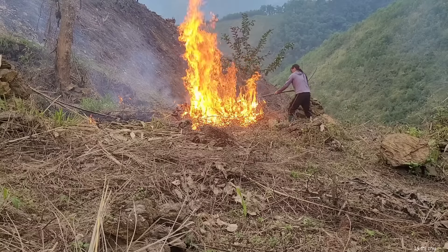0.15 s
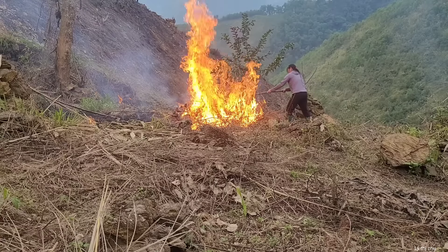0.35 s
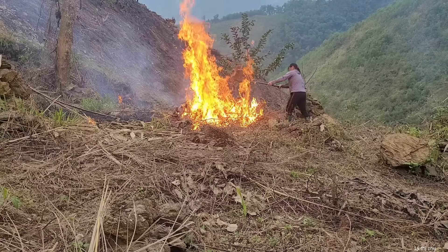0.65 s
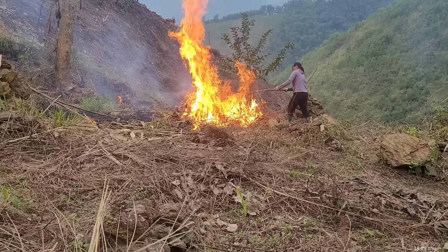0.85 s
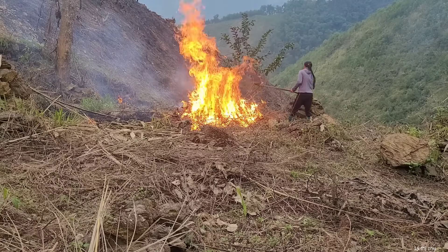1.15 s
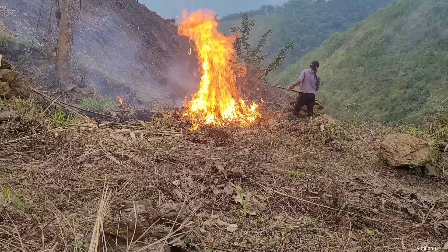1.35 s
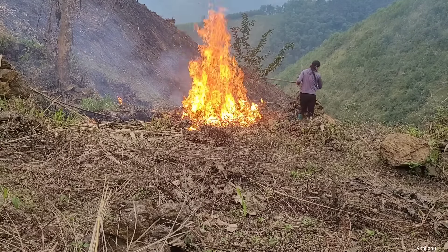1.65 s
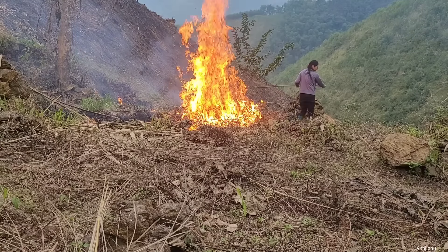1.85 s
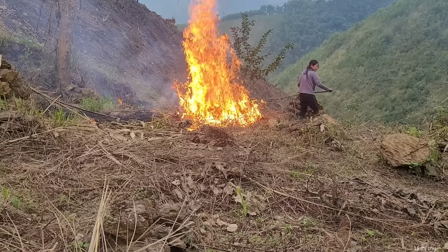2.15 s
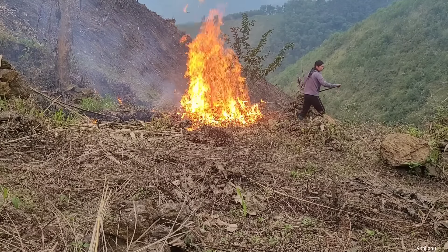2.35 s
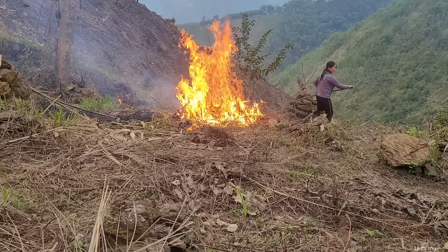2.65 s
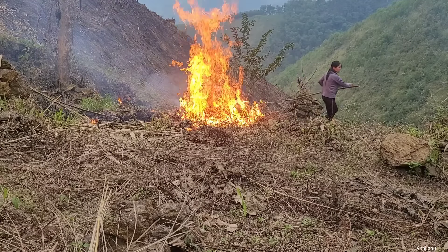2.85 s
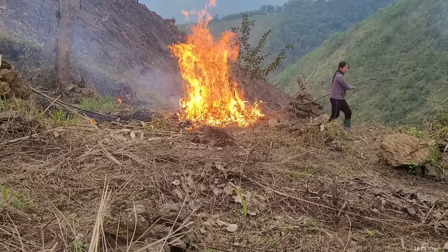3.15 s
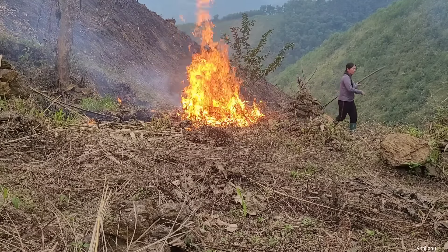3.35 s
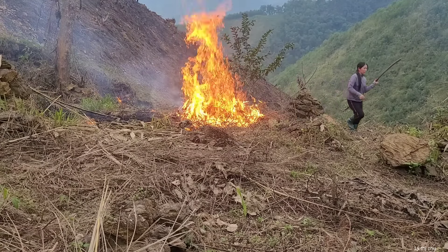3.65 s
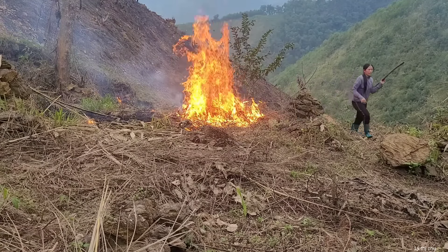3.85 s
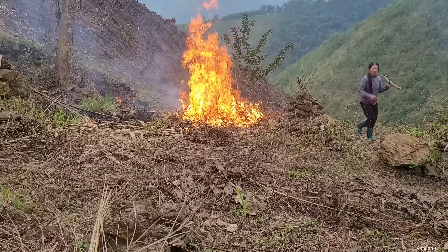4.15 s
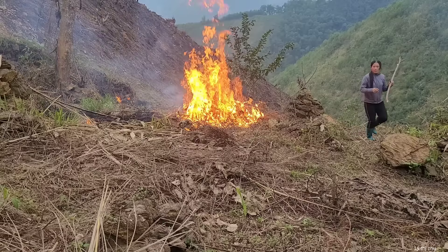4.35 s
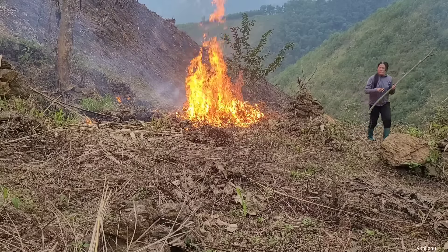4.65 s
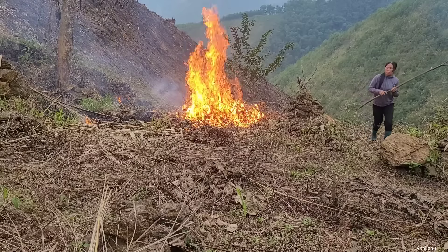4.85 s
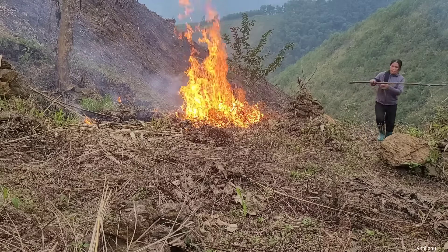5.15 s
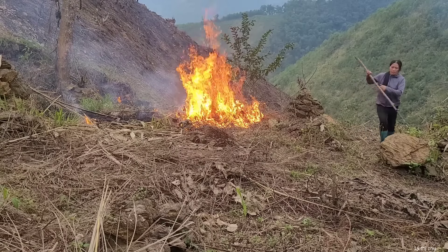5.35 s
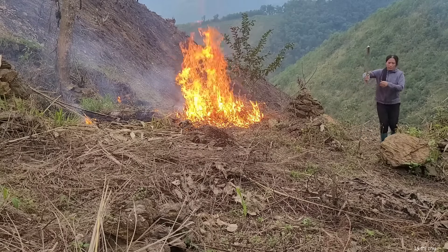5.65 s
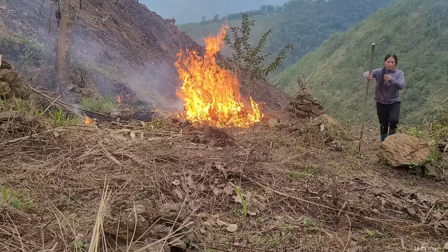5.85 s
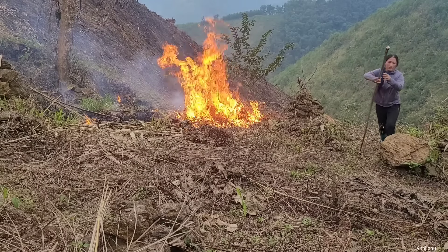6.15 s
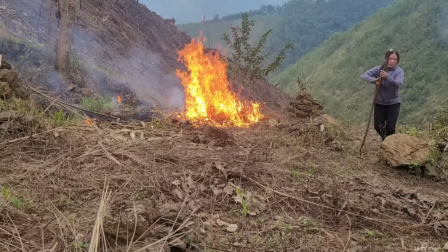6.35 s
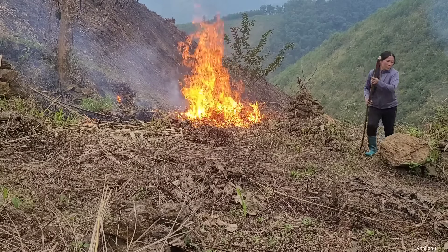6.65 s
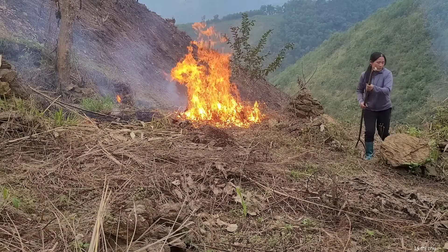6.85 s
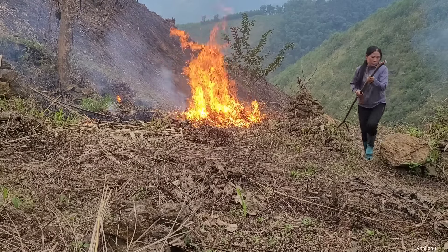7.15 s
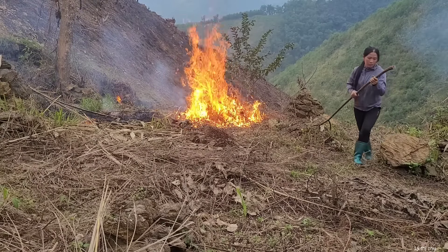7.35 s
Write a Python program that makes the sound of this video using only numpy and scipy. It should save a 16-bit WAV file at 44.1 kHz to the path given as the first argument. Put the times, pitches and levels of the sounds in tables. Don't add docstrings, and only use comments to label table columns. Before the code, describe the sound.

A brush fire on an open slope, heard in stereo from about ten metres, already burning at the start and unbroken to the end at 7.5 seconds. Fine, irregular crackle and thin hiss cover a quiet low rumble and soft roar of flames, a little fuller in the first three seconds. Small ticks and spits open the scene, with barely audible high sap whistles at 0.25 to 0.7. Hard, bright pops strike at about 1.3, 1.65 to 1.75 and 1.9. Crisp sizzling flares follow around 2.2, 2.5 and 3.1. The loudest crack, with a burst of sizzle, lands at 3.9, and a strong fizz at 4.3. Then smaller snaps continue; lower, duller pops from a farther patch come at 5.8 and 6.45, with a sharp sizzling burst at 6.05 and faint slumping rustle near 6.5. Quick dry snaps cluster after 7. Echo is short and faint.

```python
import sys
import numpy as np
from scipy import signal
from scipy.fft import rfft, irfft
from scipy.io import wavfile
from scipy.ndimage import uniform_filter1d

SR = 44100
rng = np.random.default_rng(int(sys.argv[2]) if len(sys.argv) > 2 else 0)


def volts_from_db(level):
    exponent = np.asarray(level, float) / 20
    return 10 ** exponent


def unload_audio(sound):
    columns = np.transpose(np.atleast_2d(sound))
    steps = np.round(np.clip(columns, -1, 1) * 32767)
    wavfile.write(sys.argv[1], SR, steps.astype(np.int16))


N = 330750
GRAIN = 1024

# (time [s], level [dB])
BLAZE_HEIGHT = [(0.0, -54), (0.67, -51.5), (1.13, -55), (1.65, -50.5), (3.22, -59.5), (3.74, -56),
                (5.39, -60.5), (6.5, -56), (6.79, -61), (6.98, -55.5), (7.5, -57)]
# (frequency [Hz], level per Hz [dB])
ROAR_COLOUR = [(110, 2), (160, 0), (240, 1.5), (370, -11.5), (600, -7), (800, -24), (1300, -19.5)]
# (frequency [Hz], level per Hz [dB])
HISS_COLOUR = [(700, -16), (1300, -4), (2300, 0.5), (3700, 8), (7500, 4.5), (9300, 7.5), (16000, 9)]
# (time [s], level [dB])
BUSYNESS = [(0.0, -45.5), (1.04, -47.5), (1.13, -54.5), (1.24, -43.5), (1.42, -48.5), (1.59, -44),
            (1.77, -44), (2.84, -47), (3.05, -43), (3.36, -48), (3.95, -44), (4.3, -47.5), (4.55, -46.5),
            (5.03, -50), (5.4, -45.5), (6.31, -47.5), (6.7, -44.5), (7.3, -47.5)]
# (time [s], sizzle level [dB])
STRAWS = [(0.0282, -40), (0.2292, -22.5), (0.2443, -24), (.864, -25.5), (1.024, -25), (1.2057, -28),
          (1.282, -24), (1.316, -24.5), (1.803, -33), (2.0374, -25), (2.103, -26), (2.3277, -21),
          (2.405, -25.5), (2.4653, -25.5), (2.9778, -19), (3.36, -26), (3.5923, -34), (3.7558, -28),
          (4.496, -30), (4.963, -30.5), (5.0773, -26), (5.128, -29), (5.178, -24), (5.2871, -27.5),
          (5.4535, -20.5), (5.4967, -26.5), (5.6123, -23.5), (6.129, -23.5), (7.0837, -27.5),
          (7.3599, -25.5)]
# (time [s], sizzle level [dB])
BLADES = [(0.2492, -20.5), (.788, -23), (.8267, -26.5), (0.912, -35), (1.39, -20.5), (1.445, -22.5),
          (1.6507, -19.5), (1.7766, -25), (1.9322, -33), (2.5586, -27), (2.716, -22), (2.837, -25),
          (2.89, -23), (2.97, -35), (3.1471, -42), (3.2035, -29), (3.2755, -22.5), (4.0683, -38),
          (4.2305, -23), (4.3946, -27.5), (4.482, -22.5), (4.618, -24), (4.6715, -25), (4.8762, -21.5),
          (5.071, -23), (5.203, -29), (5.8085, -24.5), (5.985, -26), (6.203, -29.5), (6.2634, -28)]
# (time [s], crack level [dB], crack frequency [Hz])
TWIGS = [(0.3386, -24, 5040), (0.361, -25.5, 4430), (0.3782, -27, 4800), (0.533, -29, 1390),
         (0.6544, -43, 5440), (1.1995, -30, 1600), (1.514, -39, 1570), (2.0409, -25, 4200),
         (3.4137, -22.5, 5230), (3.5188, -24.5, 1690), (3.5822, -25.5, 5400), (3.673, -34, 5100),
         (3.705, -40, 5800), (4.029, -27, 4500), (4.1101, -24, 4060), (4.1292, -27, 4900),
         (4.649, -26, 1050), (5.5195, -25, 3900), (5.627, -32, 5800), (5.9495, -29, 5700),
         (6.6285, -27, 4260), (6.7267, -27, 5260), (6.8672, -28, 3250), (7.099, -28.5, 2720),
         (7.176, -25.5, 1200), (7.2321, -22.5, 4220), (7.3092, -22, 3320), (7.471, -25.5, 5700)]
# (time [s], sizzle level [dB], crack level [dB], crack frequency [Hz])
STEMS = [(0.473, -25.5, -19.5, 2500), (0.9554, -24, -21, 4600), (0.9866, -30, -23.5, 1610),
         (1.3702, -22, -21.5, 5100), (1.7468, -22, -35, 5800), (1.7892, -21, -22, 4700),
         (1.9242, -29, -15.5, 3930), (2.0797, -29, -34, 3800), (2.1111, -34, -17, 5000),
         (2.8504, -35, -18.5, 6070), (2.8711, -18, -21.5, 4240), (3.0532, -28, -23, 4730),
         (3.088, -23, -21, 4400), (3.2277, -44, -18, 7040), (3.568, -21.5, -26, 3300),
         (3.927, -21, -20, 3100), (4.3734, -29, -26, 3600), (4.4174, -25.5, -26, 4180),
         (4.6599, -27, -25.5, 6030), (4.837, -33, -20.5, 5100), (5.1065, -43, -20.5, 5300),
         (5.6675, -22, -22.5, 4670), (5.6844, -25, -21.5, 4950), (5.8392, -31, -25, 4230),
         (5.8733, -26, -23, 3800), (6.1318, -43, -28, 6040), (6.549, -23, -24.5, 4400),
         (7.0297, -33, -16, 4960), (7.037, -20, -41, 4300), (7.424, -48, -22.5, 6400)]
# (time [s], sizzle level [dB], sizzle frequency [Hz])
TUFTS = [(0.0573, -42, 10500), (1.243, -17, 12000), (1.509, -11, 12300), (2.1579, -12, 10300),
         (2.1804, -11.5, 14000), (2.2103, -13, 10100), (2.4757, -8.5, 9500), (2.6122, -21, 9500),
         (2.6359, -18.5, 8900), (2.6653, -14, 13600), (2.761, -17, 10500), (3.101, -14.5, 10500),
         (3.166, -11, 8700), (3.7608, -19, 10500), (3.9546, -10.5, 10500), (4.2444, -18.5, 10500),
         (4.3298, -3, 8900), (4.534, -17.5, 10500), (4.812, -14, 10500), (5.2353, -15.5, 9200),
         (5.7543, -16.5, 10500), (5.8684, -21.5, 10500), (6.745, -11.5, 10500), (6.941, -18, 12600)]
# (time [s], crack level [dB], crack frequency [Hz], thump level [dB], sizzle level [dB])
STALKS = [(0.111, -22, 5100, -47, -33), (0.14, -20, 2090, -21.5, -16), (0.964, -20.5, 5100, -43, -19.5),
          (1.2656, -20, 5100, -47, -14.5), (1.3257, 0.5, 3930, -29, -9), (1.6058, -22, 5600, -36.5, -14),
          (1.6563, 0.5, 1560, -15, -30), (1.703, -12, 4200, -32, -14), (1.707, -13.5, 5000, -37, -35),
          (1.7329, -8.5, 1280, -21, -16), (1.9152, 2, 3600, -25.5, -16), (2.3125, -26.5, 1100, -33.5, -36),
          (2.797, -13, 2260, -26, -14.5), (3.0772, -14, 5850, -28.5, -9), (3.793, -12, 3640, -43, -14.5),
          (3.888, 4.5, 3230, -18.5, 1.5), (3.9018, -16, 3200, -40, -25), (4.051, -20, 5000, -53, -16),
          (4.3295, -14, 3100, -41, -25), (5.3705, -13.5, 5270, -35.5, -20), (6.035, -11, 6500, -40, -5),
          (7.0042, -16, 2220, -33, -28), (7.257, -20.5, 4470, -33, -15), (7.3158, -15.5, 6450, -32.5, -32)]
# (time [s], crack level [dB], crack frequency [Hz], thump level [dB], sizzle level [dB])
FLANK_POPS = [(0.6794, -24, 2960, -35, -56), (2.9248, -26.5, 2560, -45, -30.5),
              (3.123, -30, 1460, -49, -31.5), (3.5563, -25.5, 5300, -48, -30),
              (4.0594, -18, 1970, -27.5, -22), (5.1969, -21.5, 740, -31, -32),
              (5.5029, -32, 1240, -50, -37), (5.8001, -18, 1040, -26, -28.5),
              (6.0424, -12.5, 2730, -42, -21), (6.447, -9, 790, -12.5, -22), (6.639, -25.5, 610, -47, -40)]
# (time [s], length [s], start frequency [Hz], top frequency [Hz], level [dB])
SAP_NOTES = [
    (.25, .06, 8250, 8650, -52),
    (.39, .17, 8600, 9100, -57),
    (.56, .155, 7500, 8520, -56),
]
# (time [s], level [dB], length [s])
SLUMPS = [
    (0.688, -53, 0.0095),
    (6.48, -55, .025),
    (6.629, -52, 0.026),
    (7.237, -70, .04),
]

ROAR_DB, ROAR_FOLLOWS = -56.5, 0.15
SIZZLE_HZ = 10500
TWIG_SIZZLE_DB, STRAW_CRACK_DB, BLADE_CRACK_DB = -32, -4, -13
STRAW_HZ, BLADE_HZ = 5100, 5100
TUFT_CRACK_DB, TUFT_CRACK_HZ, TUFT_THUMP_DB = -26, 5700, -30.5
STALK_PAN_DB, TUFT_PAN_DB, FLANK_PAN_DB = -0.3, -1.5, 0.3
FLANK_LEAD_S = 4.1e-4
SAP_RISE_S, SAP_SAG_HZ_PER_S, SAP_FLUTTER_DB = 0.03, 2000, 3
TOP_HZ = 15750


def resonance(f, hz, q):
    return 1 / (1 + 1j * q * (f / hz - hz / f)) ** 2


def walk(rate):
    hold = int(SR / rate)
    steps = np.repeat(rng.standard_normal(N // hold + 1), hold)
    x = uniform_filter1d(uniform_filter1d(steps, hold), hold)[:N]
    return x / x.std()


def noise(shape, alike):
    f = np.arange(1, N // 2 + 2) * SR / N
    mid, side = rfft(rng.standard_normal((2, N))) * shape(f)
    likeness = np.clip(alike(f), 0, 1)
    mid = np.sqrt(1 + likeness) * mid
    side = np.sqrt(1 - likeness) * side
    x = irfft(mid + side * np.array([[1], [-1]]), N)
    return x / x.std()


def colour(points):
    hz, db = np.transpose(points)
    return lambda f: volts_from_db(np.interp(np.log(f), np.log(hz), db, left=-60, right=-60))


def flames(rumble_db, roar_db):
    rumble = noise(lambda f: resonance(f, 63.1, 1.14), lambda f: np.clip(f / 80, 0.5, 0.9))
    roar = noise(colour(ROAR_COLOUR), lambda f: 0.93 - 0.23 * np.clip(np.log2(f / 250), 0, 2))
    rumble = rumble * volts_from_db(rumble_db + 4.0 + 1.8 * walk(5.83))
    return rumble + roar * volts_from_db(roar_db + 3.0 + 2.07 * walk(14))


def onsets():
    return np.sort([row[0] for row in STALKS + TUFTS + STEMS + TWIGS + STRAWS + BLADES])


def hiss(busy_db, count=420):
    when, size = rng.random((count, 2)).T
    spit_db = -3.5 - 5 * np.log(1 - 0.95 * size)
    spits = np.bincount((when * N).astype(int), volts_from_db(spit_db), N)
    after = np.bincount((onsets() * SR).astype(int), minlength=N) * volts_from_db(-24.0)
    spits = signal.lfilter([1], [1, -np.exp(-1 / (0.003 * SR))], spits)
    after = signal.lfilter([1], [1, -np.exp(-1 / (0.036 * SR))], after)
    gain = volts_from_db(-5.5 + 3.5 * walk(30)) + spits + after
    return noise(colour(HISS_COLOUR), lambda f: 0.3 - f / 30000) * volts_from_db(busy_db) * gain


def bursts(s, crack_db, crack_hz, thump_db, sizzle_db, pan_db, lead_s, rattle_db, rattle_ms, rise_ms,
           thump_hz=420, thump_q=0.4, reach=3.23, sizzle_hz=SIZZLE_HZ):
    f = np.arange(1, GRAIN // 2 + 2) * SR / GRAIN
    t_ms = np.arange(GRAIN) * 1000 / SR
    chance = rng.standard_normal((len(s), 4))
    scatter = rng.standard_normal((len(s), 4, GRAIN))
    echoes = (0.59 * scatter[:, :1] + 0.84 * scatter[:, 1:3]) * scatter[:, 3:] ** 2
    fade = volts_from_db(rattle_db) * np.exp(-t_ms / rattle_ms) * (1 - np.exp(-t_ms / rise_ms))
    rattle = echoes * fade
    rattle = rattle * np.linalg.norm(fade) / np.linalg.norm(rattle, axis=2, keepdims=True)
    rattle = rfft(rattle) * f ** 2 / (f ** 2 + 650 ** 2)

    crack = (crack_db + 2.5, crack_hz, 0.39 + crack_hz / 20000, 1)
    thump = (thump_db + 3.5, thump_hz * volts_from_db(chance[:, 0]), thump_q + 0 * s, 1)
    sizzle = (sizzle_db + 10.0, sizzle_hz * volts_from_db(0.58 * chance[:, 1]), 0.61 + 0 * s, 0.5)
    sound = 0
    for db, hz, q, direct in (crack, thump, sizzle):
        push = 1 / (1 + 1j * f / (reach * hz[:, None])) ** 2
        part = resonance(f, hz[:, None], q[:, None]) * push
        peak = np.abs(irfft(part)).max(axis=1)
        part = part * (volts_from_db(db) / peak)[:, None]
        sound = sound + part[:, None] * (direct + rattle)

    side = np.array([1, -1]) / 2
    lag_s = 4e-4 - (lead_s + 2.5e-5 * chance[:, 2])[:, None] * side
    lag = np.exp(-2j * np.pi * f * lag_s[:, :, None])
    place = volts_from_db(pan_db[:, None] * side)[:, :, None] * lag
    out = np.zeros((2, N + 2 * GRAIN))
    starts = ((s - 5.5e-4) * SR).astype(int)
    for start, grain in zip(starts, irfft(sound * place)):
        out[:, start:start + GRAIN] += grain
    return out[:, :N]


def crackle(busy_db, count=1150):
    when, size, pitch, tilt, place, loose = rng.random((count, 6)).T
    burst_s = onsets()
    trailing_s = burst_s[np.arange(count) % len(burst_s)] - 0.006 - 0.02 * np.log(1 - when)
    s = np.where(loose < 0.45, when * N / SR, trailing_s)
    s = np.clip(s, 0.001, N / SR - 0.001)
    sizzle_db = busy_db[(s * SR).astype(int)] + 4.0 - 3.95 * np.log(1 - 0.96 * size)
    crack_db = sizzle_db - 4.0 - 5.4 * tilt
    lead_s = FLANK_LEAD_S * (place < 0.3)
    return bursts(s, crack_db, 1300 * 4.6 ** pitch, crack_db - 19.5, sizzle_db, 6.0 * (pitch - 0.6),
                  lead_s, rattle_db=-11.0, rattle_ms=1.51, rise_ms=0.4)


def slope(x):
    t = np.arange(SR // 4) / SR
    patchy = volts_from_db(3 * np.repeat(rng.standard_normal(len(t) // 64 + 1), 64)[:len(t)])
    fade = volts_from_db(-44.5) * np.exp(-t / 0.02) + volts_from_db(-50) * np.exp(-t / 0.042)
    onset = np.clip(t / 0.00092, 0, 1)
    tail = rng.standard_normal((2, len(t))) * patchy * fade * onset
    tail = signal.lfilter(*signal.butter(1, 6000, fs=SR), tail)
    return signal.fftconvolve(x, tail, axes=1)[:, :N]


def ticks():
    twigs = [(s, db + TWIG_SIZZLE_DB, db, hz) for s, db, hz in TWIGS]
    straws = [(s, db, db + STRAW_CRACK_DB, STRAW_HZ) for s, db in STRAWS]
    blades = [(s, db, db + BLADE_CRACK_DB, BLADE_HZ) for s, db in BLADES]
    s, sizzle_db, crack_db, crack_hz = np.transpose(STEMS + twigs + straws + blades)
    thump_db = crack_db - 9.0 - 4.86 * np.log2(crack_hz / 1000)
    pan_db = 0.36 * rng.standard_normal(len(s)) - 1.2
    lead_s = FLANK_LEAD_S * (crack_hz < 1750)
    return bursts(s, crack_db - 8.0, crack_hz, thump_db, sizzle_db - 6.0, pan_db,
                  lead_s, rattle_db=-10.5, rattle_ms=2.6, rise_ms=0.23)


def pops():
    tufts = [(s, db + TUFT_CRACK_DB, TUFT_CRACK_HZ, db + TUFT_THUMP_DB, db, TUFT_PAN_DB, hz)
             for s, db, hz in TUFTS]
    stalks = [(*row, STALK_PAN_DB, SIZZLE_HZ) for row in STALKS]
    *heap_rows, sizzle_hz = np.transpose(stalks + tufts)
    heap = bursts(*heap_rows, 0, rattle_db=-24, rattle_ms=2.5, rise_ms=0.1, sizzle_hz=sizzle_hz)
    flank_rows = np.transpose([(*row, FLANK_PAN_DB) for row in FLANK_POPS])
    flank = bursts(*flank_rows, FLANK_LEAD_S, rattle_db=-10.5, rattle_ms=2.37, rise_ms=0.35,
                   thump_hz=397, thump_q=1.0, reach=1.15)
    return flank - heap


def sap():
    t = np.arange(N) / SR
    out = 0
    for s, length, start_hz, top_hz, db in SAP_NOTES:
        age = np.clip(t - s, 0, length)
        climb_hz = top_hz - (top_hz - start_hz) * np.exp(-age / SAP_RISE_S)
        pitch_hz = (climb_hz - SAP_SAG_HZ_PER_S * age) * (1 + 0.0048 * walk(34))
        swell = np.sqrt(np.abs(np.sin(np.pi * age / length))) * (t - s < length)
        tone = np.sin(2 * np.pi * np.cumsum(pitch_hz) / SR)
        out = out + swell * volts_from_db(db + SAP_FLUTTER_DB * walk(31)) * tone
    return out


def slumps():
    t = np.arange(N) / SR
    swell = sum(volts_from_db(db) * np.exp(-((t - s) / length) ** 2) for s, db, length in SLUMPS)
    rustle = noise(lambda f: resonance(f, 560, 1.7), lambda f: 0.9 + 0 * f)
    return rustle * swell * volts_from_db(7.8 * walk(150))


def scene():
    t = np.arange(N) / SR
    rumble_db = np.interp(t, *np.transpose(BLAZE_HEIGHT))
    roar_db = ROAR_DB + ROAR_FOLLOWS * (rumble_db - rumble_db.mean())
    busy_db = np.interp(t, *np.transpose(BUSYNESS))
    near = pops() + ticks() + crackle(busy_db)
    return near + slope(near) + flames(rumble_db, roar_db) + hiss(busy_db) + slumps() + sap()


def band_limit(x):
    return signal.sosfilt(signal.butter(12, 16640, fs=SR, output="sos"), x)


def record(dry):
    ringing = dry + 0.25 * signal.lfilter(*signal.iirpeak(7500, 5.0, fs=SR), dry)
    shaded = ringing - 0.27 * signal.lfilter(*signal.iirpeak(9500, 4.0, fs=SR), ringing)
    rounded = 0.8 * np.tanh(shaded / 0.8)
    low_pass = signal.ellip(8, 0.2, 60, TOP_HZ, fs=SR, output="sos")
    mix = signal.sosfilt(low_pass, rounded)
    return band_limit(mix)


dry = scene()
out = record(dry)
unload_audio(out)
```